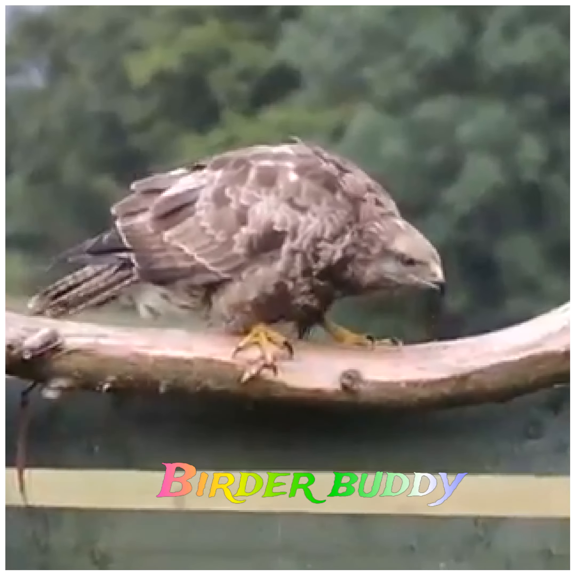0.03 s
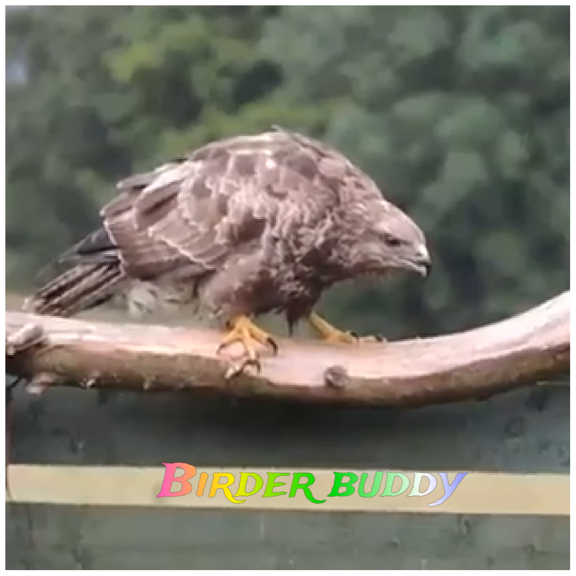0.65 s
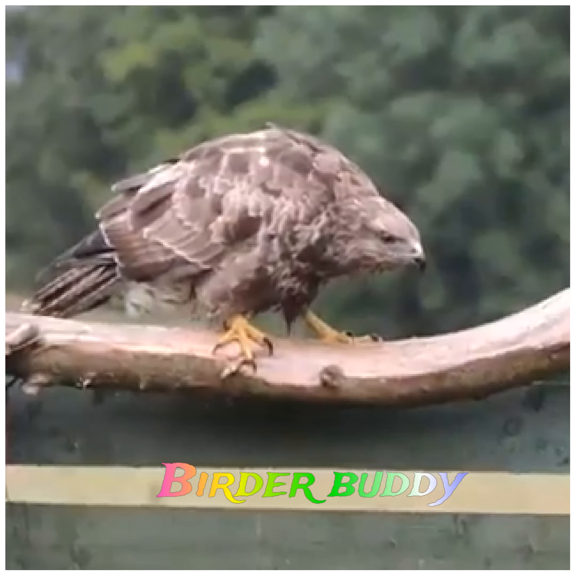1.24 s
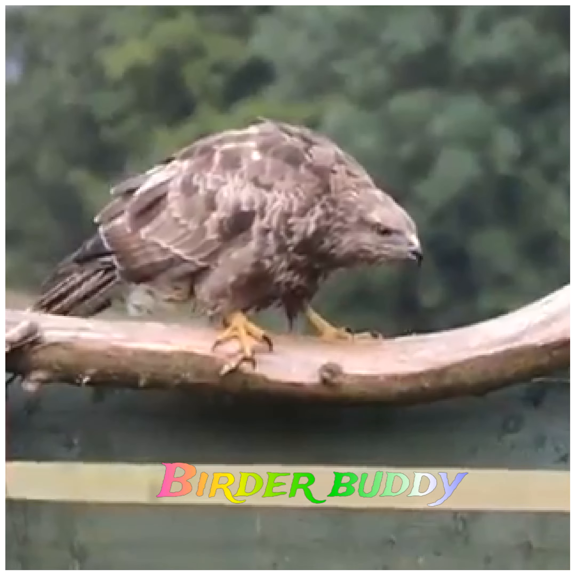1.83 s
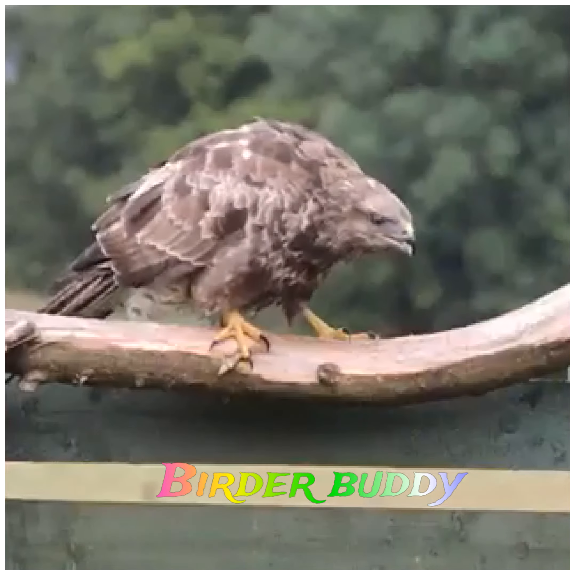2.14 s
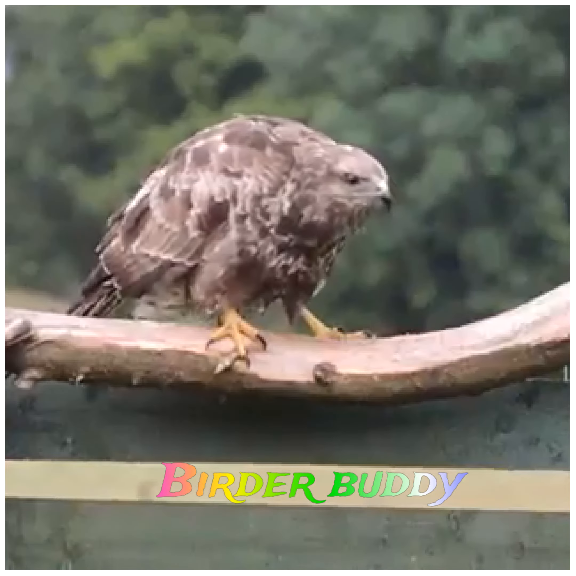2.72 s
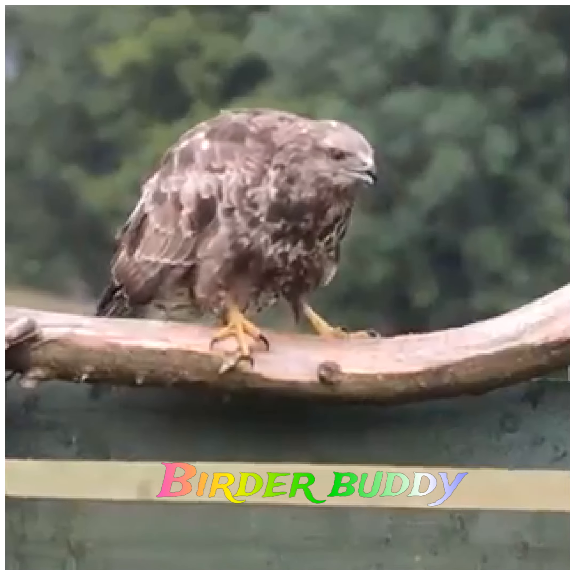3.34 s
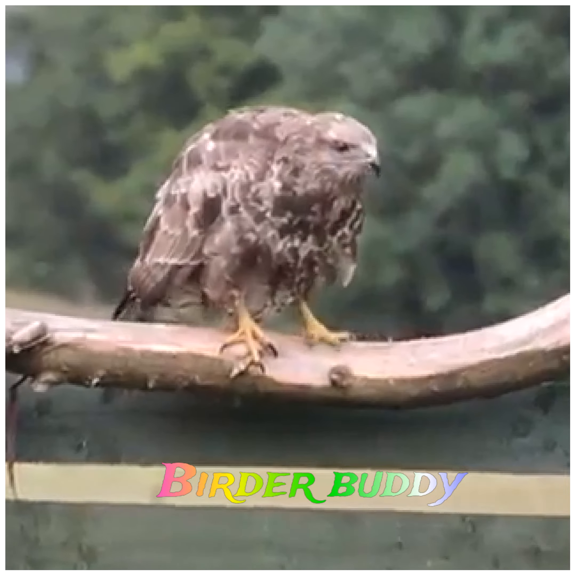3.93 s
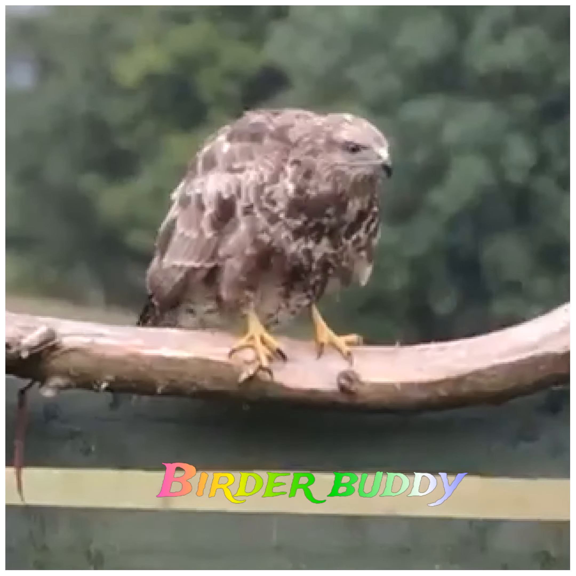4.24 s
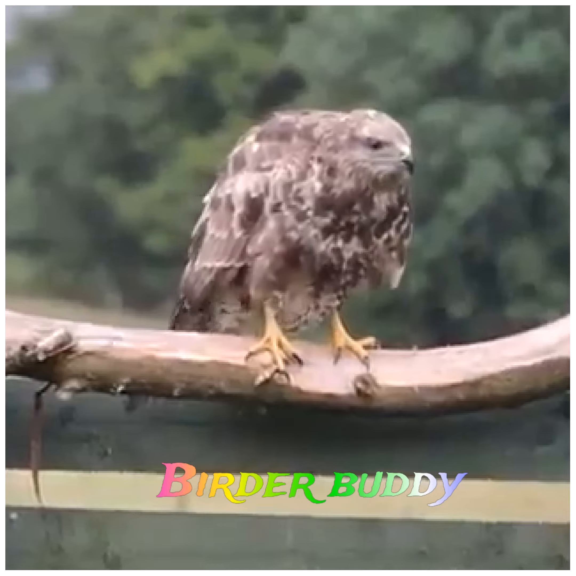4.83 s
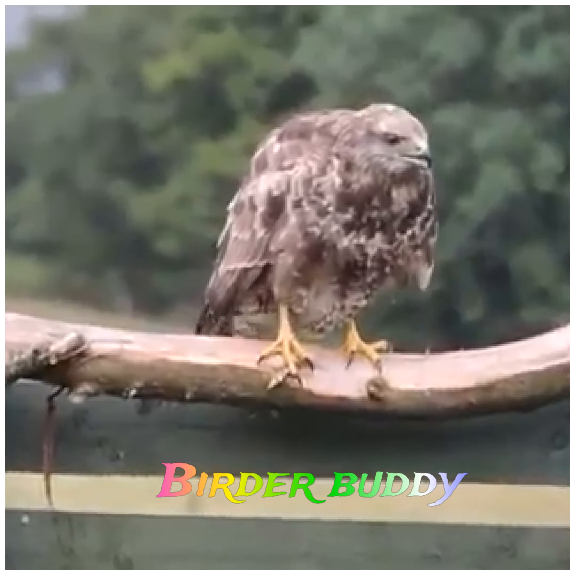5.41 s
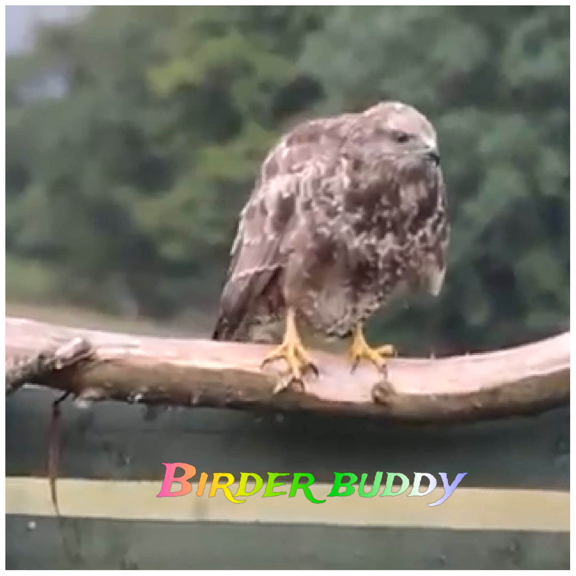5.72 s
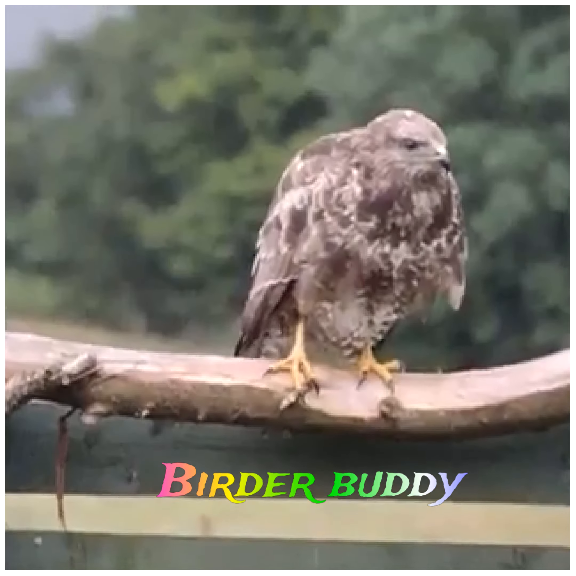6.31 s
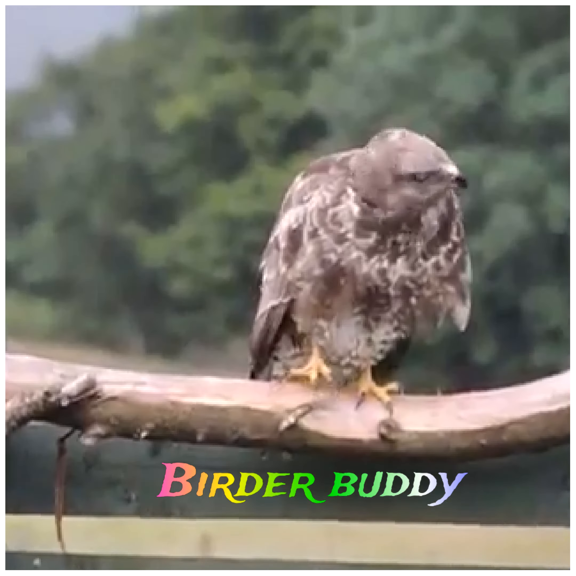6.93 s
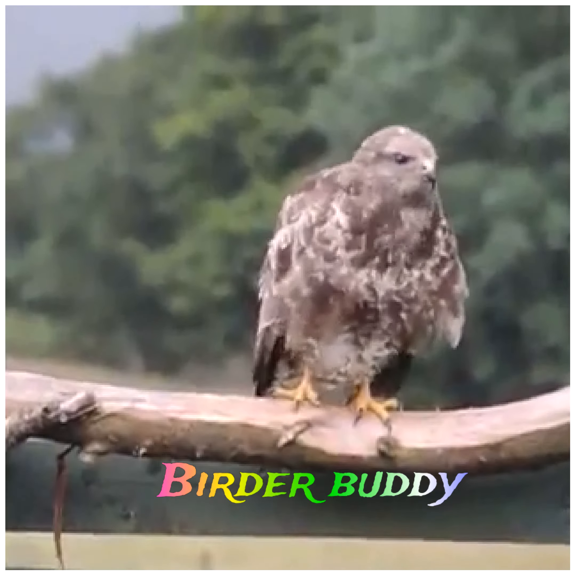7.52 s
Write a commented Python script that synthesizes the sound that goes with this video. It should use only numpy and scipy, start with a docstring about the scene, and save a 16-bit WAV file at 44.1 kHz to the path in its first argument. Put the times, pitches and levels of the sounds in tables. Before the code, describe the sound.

A buzzard gives repeated falling mews outdoors among trees, while small birds twitter and whistle over a faint rustle of leaves.

```python
"""Buzzards mewing among trees.

A perched buzzard mews again and again, hoarsely at first; a second buzzard gives two thin high mews.
Each mew is a harmonic series whose pitch arches, drops and sinks, filtered by throat and beak.
A small songbird twitters nearby in modulated pure tones; further off, others hold whistles and a
tiny one repeats a thin high note. The trees return a long soft echo over a faint rustle of leaves."""
import sys
import numpy as np
from scipy import signal
from scipy.io import wavfile
from scipy.ndimage import uniform_filter1d, map_coordinates

SR = 44100
rng = np.random.default_rng(int(sys.argv[2]) if len(sys.argv) > 2 else 0)


def transcribe(u):
    """Save the signal u as a 16-bit wav file named by the first command-line argument.

    u: samples, shape (n,) or (channels, n), limited to [-1, 1]; the rate is SR.
    q: integer samples, one column per channel.
    """
    v = np.clip(np.atleast_2d(u).T, -1, 1)
    q = np.round(v * 32767).astype(np.int16)
    wavfile.write(sys.argv[1], SR, q)


N = 333837

# Spectrum of leaves and distant air: f/Hz, relative spectral level/dB
RUSTLE_SPECTRUM = [(180, -40.5), (320, -24), (450, -7), (900, -3.5), (1500, -8.5), (2500, 1), (5000, -10),
                   (6300, -26), (8000, -41), (15000, -52.5)]
# Strength of the rustle: t/s, level/dB
RUSTLE_LEVEL = [(1.501, -47), (3.398, -50), (5.702, -50.5), (6.599, -47)]
# Reverberation time of the trees: f/Hz, T60/s
TREE_T60 = [(500, 0.15), (1200, 0.85), (2400, 0.9), (4200, 0.69), (6500, 0.22)]
# Distant whistles: t/s, duration/s, f/Hz, level/dB, scoop and quiver as fractions of f
WHISTLES = [(1.858, 0.2, 4360, -31, 0.11, 0.012), (2.19, 0.15, 4340, -29, 0.23, 0.011),
            (4.465, 0.38, 3482, -29, 0.066, 0.035), (5.198, 0.13, 3127, -32, 0.032, 0.019),
            (6.558, 0.21, 4300, -29, 0.082, 0.012), (6.92, .15, 4130, -38.5, .04, 0.016),
            (7.0, 0.07, 4850, -37.5, -0.33, .01), (7.195, 0.11, 4606, -37, -0.19, 0.0055)]
# Buzzy songbird notes, and the hoarse rasp of the buzzard's first mew (at 1.0 s):
# t/s, duration/s, start f/Hz, end f/Hz, level/dB
BUZZES_AND_RASP = [(.502, .05, 3610, 2550, -25), (.692, 0.036, 3600, 2743, -26.5),
                   (.872, 0.1, 2720, 2850, -30), (1.0, 0.42, 2656, 2158, -30.5),
                   (2.8, .18, 3690, 3580, -35), (6.87, 0.063, 6120, 5690, -54.5)]
# Single glides: t/s, duration/s, start f/Hz, end f/Hz, level/dB
SLUR_NOTES = [(.372, 0.014, 2520, 2980, -32), (1.83, 0.019, 6520, 5650, -57.5),
              (2.165, 0.028, 5360, 6440, -54), (3.845, 0.039, 4320, 3850, -41.5),
              (4.33, 0.036, 4610, 3930, -37.5), (4.937, 0.0093, 3720, 3330, -32.5),
              (5.006, 0.029, 3370, 4300, -28.5), (5.63, 0.036, 8500, 8030, -75.5),
              (5.77, 0.073, 8300, 8050, -74), (6.202, 0.039, 3490, 3050, -23.5),
              (6.27, 0.086, 3060, 2203, -30), (7.083, 0.0069, 4820, 4220, -23),
              (7.197, 0.018, 2880, 3700, -24), (7.254, 0.01, 4030, 3470, -18.5),
              (7.271, .015, 3130, 3950, -26.5), (7.335, 0.0077, 3700, 4090, -22.5),
              (7.428, 0.0094, 3990, 3450, -23), (7.517, 0.0085, 3730, 4330, -30)]
# Up-and-down chirps: t/s, duration/s, foot f/Hz, peak f/Hz, level/dB
CHIRP_NOTES = [(.564, 0.043, 3080, 5070, -25.5), (.763, 0.043, 2906, 4930, -29.5),
               (5.058, 0.055, 3370, 4290, -29.5), (6.234, .036, 3280, 4100, -22.5),
               (7.064, .022, 3890, 5570, -34.5), (7.112, 0.0098, 3160, 3720, -21.5),
               (7.172, 0.015, 3370, 4700, -23.5)]
# The slurs of one twitter: delay/s, duration/s, start f/Hz, end f/Hz, relative level/dB
TWITTER_MOTIF = [(.002, .02, 4790, 3565, -4), (0.024, 0.014, 3166, 3690, 0.5),
                 (0.036, .018, 4755, 3423, -1.5)]
# Repeats of the twitter: t/s, level/dB
TWITTER_ONSETS = [(-.036, -19), (.06, -20.5), (0.166, -21.5), (0.273, -20.5), (.386, -21)]
# A buzzard's source spectrum, from the fundamental up: relative level/dB
SOURCE_HARMONICS = [-0.78, -4.5, -10, -17, -17.5, -29]
# Response of throat and open beak: f/Hz, gain/dB
THROAT_RESPONSE = [(500, -54.5), (750, -34), (1050, -18), (1400, -22.5), (1750, -13), (2100, 1.5),
                   (2450, 10.5), (2900, -0.7), (3350, -12), (4000, -13.5), (4700, -14.5), (5500, -30),
                   (6500, -40.5), (8000, -70)]
# The second buzzard's thin mews: t/s, duration/s, top f/Hz, drop/Hz, sag/(Hz/s), hold time/s,
# fall after the hold/(Hz/s), source level/dB, decay/(dB/s), tilt/(dB/harmonic)
THIN_CALLS = [(1.368, .683, 1615, 13, 1005, .41, 1456, -14, 26.5, -0.14),
              (3.899, 1, 1518, 222, 20, .47, 1740, -14.5, 34.5, -3.66)]
# The first buzzard's full mews: t/s, duration/s, rise time/s, top f/Hz, drop/Hz, drop time/s, sag/(Hz/s),
# quaver as a fraction of f, source level/dB, swell at the top/dB, end change/dB, tilt/(dB/harmonic)
FULL_CALLS = [(0.964, .335, 0.074, 1215, 211, 0.11, 1680, 0.0003, -28, -0.5, -5.5, -5.5),
              (2.413, 0.56, 0.084, 1325, 268, 0.098, 1122, 0.00078, -21, 7, -4, -0.3),
              (3.505, 0.41, 0.08, 1193, 269.6, 0.073, 1024, 0, -16.5, 1, -2.5, -0.94),
              (4.372, 0.27, 0.063, 1070, 370.8, 0.11, 396, 0, -15.5, -3.3, -8.3, -2),
              (5.973, 0.24, .043, 863, 87.7, 0.0242, 1259, 0.048, -17.5, -1, -9.5, -2),
              (6.773, 0.11, 0.025, 993.6, 228, 0.051, 1950, 0.013, -10, -8.5, -22.5, -3.5),
              (7.249, 0.3, 0.056, 1079, 460, .19, 140.5, 0, -18.5, 2.3, 2.5, -4.5)]


def gain_of(db):
    """Amplitude ratio of a level in decibels."""
    return 10 ** (np.asarray(db) / 20)


def unit_rms(x):
    """Normalisation to an rms amplitude of 1."""
    return x / np.sqrt(np.mean(x ** 2) + 1e-20)


def at_frequency(table, hz):
    """Interpolation on a logarithmic frequency axis."""
    f, value = np.transpose(table)
    return np.interp(np.log(hz + 1), np.log(f + 1), value)


def add(mix, s, sound):
    """Superposition of a sound from time s, or from zero if s is negative."""
    part = mix[max(round(s * SR), 0):][:len(sound)]
    part += sound[:len(part)]


def wander(t, rate):
    """Smooth random modulation: a spline through rate Gaussian values a second."""
    knots = rng.standard_normal(4096)
    return map_coordinates(knots, [(t - t[0]) * rate], order=3, mode="wrap")


def fade(t, rise, fall):
    """Envelope with sine-squared onset and release."""
    return np.sin(np.pi / 2 * np.clip(np.minimum((t - t[0]) / rise, (t[-1] - t) / fall), 0, 1)) ** 2


def leaves(patchy_db=1.24):
    """Spectrally shaped noise: a rustle whose level drifts in patches of time and frequency."""
    frames, hz = N // 256 + 5, np.fft.rfftfreq(1024, 1 / SR)
    real, imag, patches = rng.standard_normal((3, frames, len(hz)))
    patches = uniform_filter1d(patches, size=16, axis=0)
    patches = unit_rms(uniform_filter1d(patches, size=12, axis=1))
    spectra = (real + 1j * imag) * gain_of(at_frequency(RUSTLE_SPECTRUM, hz) + patchy_db * patches)
    level = gain_of(np.interp(np.arange(N) / SR, *np.transpose(RUSTLE_LEVEL)))
    return level * unit_rms(signal.istft(spectra.T, nperseg=1024, noverlap=768)[1][:N])


def trees(direct, near_db, far_db, near_t60):
    """Reverberation: early scatter from perch, ground and wall, then the echo of trunks and crowns."""
    t = np.arange(2 * SR) / SR
    reflections_per_s = np.array([[900], [3000]])
    near, far = rng.standard_normal((2, len(t))) * (rng.random((2, len(t))) < reflections_per_s / SR)
    near = near * gain_of(-60 * t / near_t60) * (t > .003)
    hz, when, spectra = signal.stft(far * np.minimum(t / 0.017, 1), SR, nperseg=256)
    decay = gain_of(-60 * when / at_frequency(TREE_T60, hz)[:, None])
    far = signal.istft(spectra * decay, SR, nperseg=256)[1][:len(t)]
    echo = gain_of(near_db) * near / np.linalg.norm(near) + gain_of(far_db) * far / np.linalg.norm(far)
    return direct + signal.fftconvolve(direct, echo)[:N]


def tiny_bird(first_s=4.947, last_s=6.105, hz=6200, db=-56, count=13):
    """Periodic repetition: short high notes, each followed by a softer slur at a random pitch."""
    song = np.zeros(N)
    for s, (bend, force, leap) in zip(np.linspace(first_s, last_s, count), rng.standard_normal((count, 3))):
        note_hz, slur_hz = hz * (1 + 0.0073 * bend), hz * (.9 + 0.12 * leap)
        add(song, s, slur(0.01, .96 * note_hz, 1.02 * note_hz, db + 2 * force))
        add(song, s + .025, slur(0.025, 0.69 * slur_hz, 1.1 * slur_hz, db - 5))
    return song


def whistle(length, hz, db, scoop, quiver, decay_db=13):
    """Exponential relaxation: a pure tone slides onto its pitch, quivers there and decays."""
    t = np.arange(0, length, 1 / SR)
    pitch = hz * (1 - scoop * np.exp(-t / 0.0064) + quiver * wander(t, 400))
    level = gain_of(db - decay_db * t / length) * fade(t, 0.0064, 0.074)
    return np.sqrt(2) * level * np.sin(2 * np.pi * np.cumsum(pitch) / SR)


def rough_tone(length, start_hz, end_hz, db, trill_hz=190, swing=0.023, scatter=.045):
    """Modulation of frequency and amplitude, too fast and uneven to follow, is heard as a buzz or rasp."""
    t = np.arange(0, length, 1 / SR)
    trill = np.sin(2 * np.pi * trill_hz * t)
    hz = np.linspace(start_hz, end_hz, len(t)) * (1 + swing * trill + scatter * wander(t, 900))
    throb = 1 + .5 * (trill + wander(t, trill_hz))
    carrier = np.sin(2 * np.pi * np.cumsum(hz) / SR)
    return gain_of(db) * unit_rms(throb * carrier * fade(t, 0.11 * length, 0.2 * length))


def bird_tone(t, hz, shape_db):
    """Frequency jitter makes a small bird's pure tone slightly unsteady; its rms is 1."""
    phase = 2 * np.pi * np.cumsum(hz * (1 + 0.023 * wander(t, 400))) / SR
    return unit_rms(gain_of(shape_db) * np.sin(phase) * fade(t, 0.15 * t[-1], 0.076 * t[-1]))


def slur(length, start_hz, end_hz, db, ease=1.6, taper_db=-7):
    """A frequency glide, quick at first, that settles on its last pitch and is loudest midway."""
    t = np.arange(0, length, 1 / SR)
    hz = end_hz + (start_hz - end_hz) * (1 - t / length) ** ease
    return gain_of(db) * bird_tone(t, hz, taper_db * (2 * t / length - 1) ** 2)


def chirp(length, foot_hz, peak_hz, db, climb=.64, bow=0.33, peak_db=-16, grow_db=1):
    """A frequency sweep that climbs in a bow, weakens at the peak and snaps back down."""
    t = np.arange(0, length, 1 / SR)
    height = np.interp(t / length, [0, climb, 1], [0, 1, 0]) ** np.where(t < climb * length, bow, 1)
    hz = foot_hz + (peak_hz - foot_hz) * height
    return gain_of(db) * bird_tone(t, hz, peak_db * height ** 2 + grow_db * t / length)


def twitters():
    """Three glides in quick succession, down-up-down, group into one twitter, which repeats."""
    song = np.zeros(N)
    for s, db in TWITTER_ONSETS:
        for delay, length, start_hz, end_hz, note_db in TWITTER_MOTIF:
            if s + delay > -length / 2:
                add(song, s + delay, slur(length, start_hz, end_hz, db + note_db))
    return song


def pitch_arch(t, rise_s, top_hz, scoop, drop_hz, drop_s, sag_hz_per_s, ease_s=.05):
    """Tension sets a mew's fundamental: it scoops up, drops as the tension lets go, then sags."""
    after = np.maximum(t - rise_s, 0)
    climb = 1 - scoop * np.maximum(1 - t / rise_s, 0) ** 2
    drop = drop_hz * (1 - np.exp(-(after / drop_s) ** 2))
    sag = sag_hz_per_s * after ** 2 / (after + ease_s)
    return top_hz * climb - drop - sag


def buzzard_voice(t, hz, effort_db, tilt_db, jitter=0.0036, slack_jitter=0.0035, flutter_db=3, rasp_db=-30):
    """Source and filter: harmonics sweep through the throat, less steady as the membranes slacken."""
    slack = 1 - hz / hz.max()
    hz = abs(hz) * (1 + jitter * wander(t, 128.15) + slack_jitter * slack * wander(t, 330))
    phase = 2 * np.pi * np.cumsum(hz) / SR
    # More effort or tension strengthens the overtones.
    tilt = tilt_db + 0.082 * (effort_db - effort_db.mean()) - 3 * (slack - slack.mean())
    bite_hz, bite_width_hz, bite_db, bite_s = 3433, 594, 19.5, 0.051  # the onset briefly lifts a band
    stack = np.zeros(len(t))
    for k, source_db in enumerate(SOURCE_HARMONICS, 1):
        bite = bite_db * np.exp(-(t / bite_s) ** 2 - ((k * hz - bite_hz) / bite_width_hz) ** 2)
        flutter = flutter_db * max(abs(k - 2), .5) ** .5 * wander(t, 70)  # least on the second harmonic
        rasp = 1 + gain_of(rasp_db) * k / 2 * wander(t, 1100)  # turbulence adds noise sidebands
        throat_db = at_frequency(THROAT_RESPONSE, k * hz)
        level_db = effort_db + source_db + throat_db + (k - 2.5) * tilt + bite + flutter
        stack += gain_of(level_db) * rasp * np.sin(k * phase)
    return np.sqrt(2) * stack * fade(t, rise=0.0052, fall=0.0041)


def thin_mew(length, top_hz, drop_hz, sag_hz_per_s, hold_s, fall_hz_per_s, db, decay_db_per_s, tilt_db):
    """A soft onset and exponential decay on a high pitch, until the voice gives way in pitch and level."""
    rise_s, scoop, drop_s, onset_db = .073, .22, .168, -20
    give_way_s, give_way_db = 0.062, -12
    t = np.arange(0, length, 1 / SR)
    spent = np.maximum(t - hold_s, 0)
    hz = pitch_arch(t, rise_s, top_hz, scoop, drop_hz, drop_s, sag_hz_per_s)
    onset = onset_db * np.maximum(1 - t / rise_s, 0) ** 2
    decay = decay_db_per_s * np.maximum(t - spent - rise_s, 0)
    give_way = give_way_db * np.minimum(spent / give_way_s, 1)
    return buzzard_voice(t, hz - fall_hz_per_s * spent, db + onset - decay + give_way, tilt_db)


def full_mew(length, rise_s, top_hz, drop_hz, drop_s, sag_hz_per_s, quaver, db, swell_db, end_db, tilt_db):
    """Effort shapes the envelope: a hard onset, a swell or dip at the top, and mostly a late fade."""
    scoop_per_s, quaver_hz, swell_s = 5.3, 18.5, 0.04
    t = np.arange(0, length, 1 / SR)
    hz = pitch_arch(t, rise_s, top_hz, scoop_per_s * rise_s, drop_hz, drop_s, sag_hz_per_s)
    vibrato = quaver * np.minimum(t / rise_s, 1) ** 2 * np.cos(2 * np.pi * quaver_hz * (t - rise_s))
    swell = swell_db * np.exp(-((t - rise_s) / swell_s) ** 2)
    ending = end_db * (t / length) ** 5.8
    return buzzard_voice(t, hz * (1 + vibrato), db + swell + ending, tilt_db)


def scene():
    """Superposition of three groups of calls over the leaves; the furthest is the most reverberant."""
    buzzards, midground, far_birds = np.zeros(N), twitters(), tiny_bird()
    for table, sing, track in ((FULL_CALLS, full_mew, buzzards), (THIN_CALLS, thin_mew, buzzards),
                               (CHIRP_NOTES, chirp, midground), (SLUR_NOTES, slur, midground),
                               (BUZZES_AND_RASP, rough_tone, midground), (WHISTLES, whistle, far_birds)):
        for s, *note in table:
            add(track, s, sing(*note))
    close = trees(buzzards, near_db=-8, far_db=-12.5, near_t60=0.29)
    further = trees(midground, near_db=-4.5, far_db=-17.5, near_t60=0.18)
    furthest = trees(far_birds, near_db=-5.0, far_db=-9, near_t60=0.24)
    return (close + further + furthest + leaves())[None]


def record(dry):
    """Band limiting: a linear-phase low-pass filter removes the highest treble."""
    lowpass = signal.firwin(511, cutoff=15700, window=("kaiser", 9), fs=SR)
    return signal.oaconvolve(dry, lowpass[None], "same")


dry = scene()
out = record(dry)
transcribe(out)
```